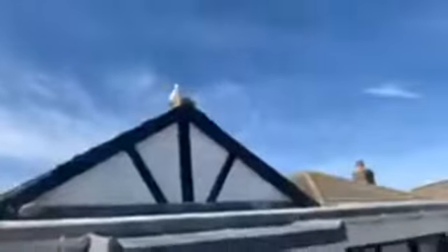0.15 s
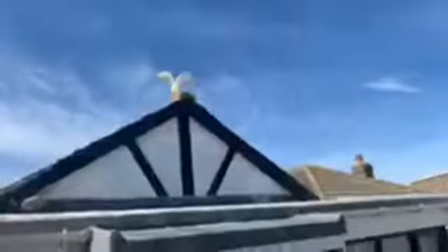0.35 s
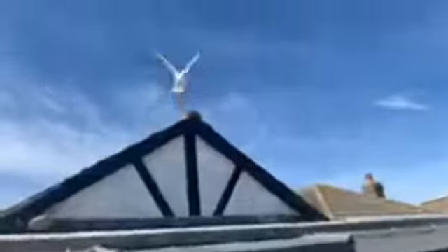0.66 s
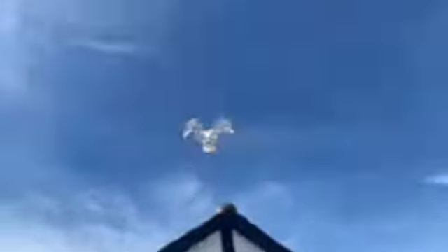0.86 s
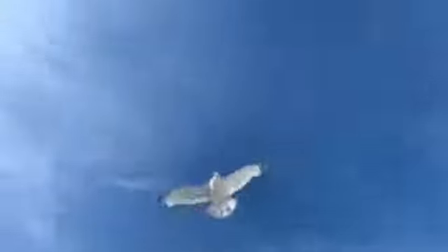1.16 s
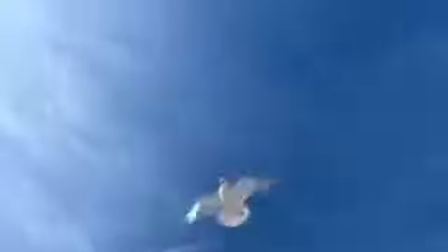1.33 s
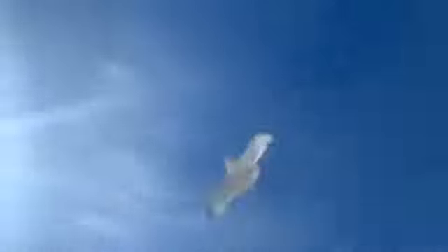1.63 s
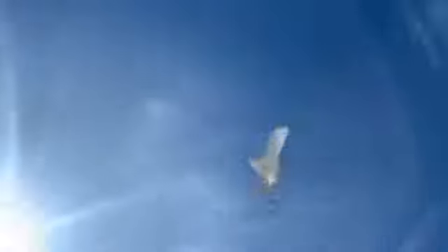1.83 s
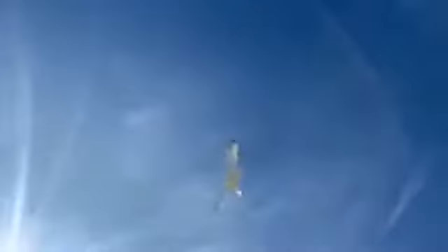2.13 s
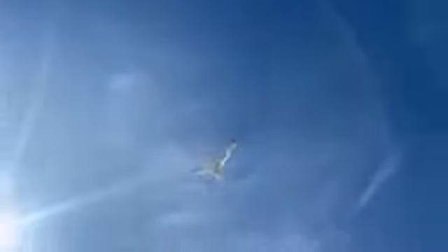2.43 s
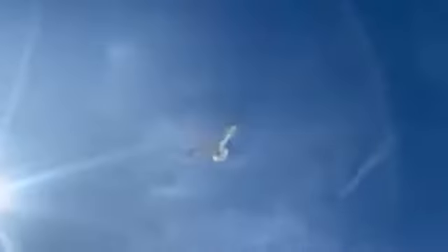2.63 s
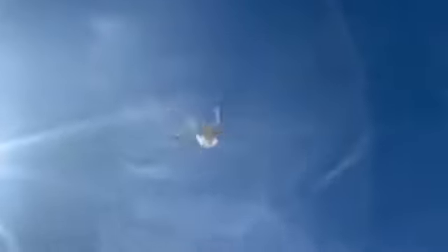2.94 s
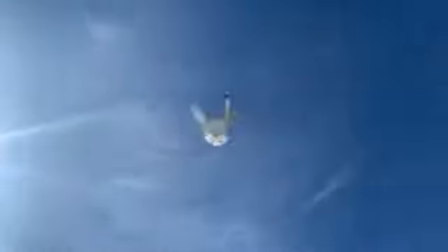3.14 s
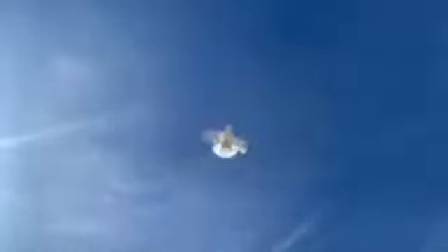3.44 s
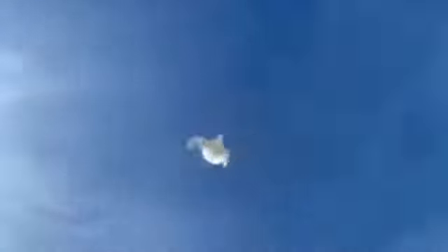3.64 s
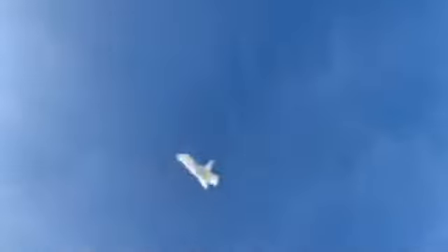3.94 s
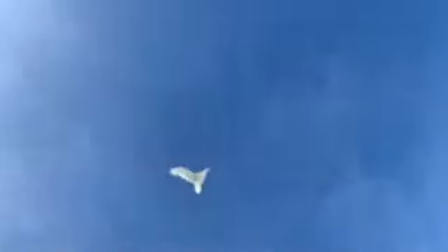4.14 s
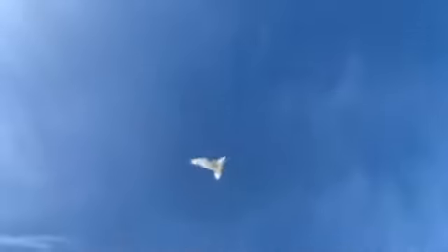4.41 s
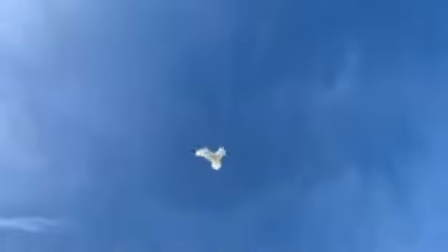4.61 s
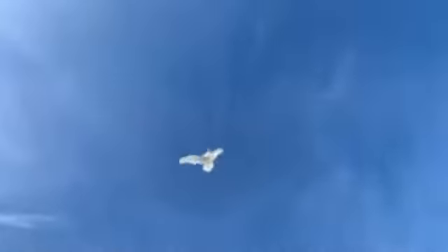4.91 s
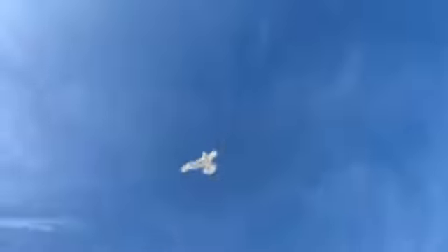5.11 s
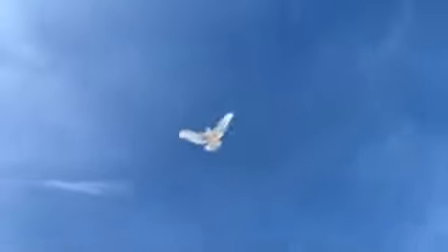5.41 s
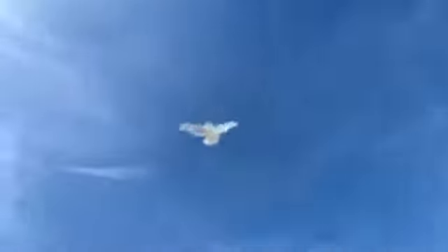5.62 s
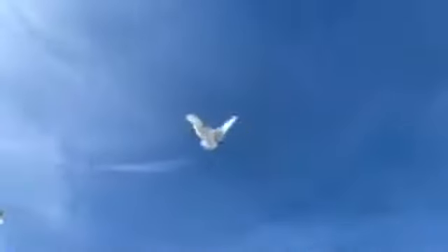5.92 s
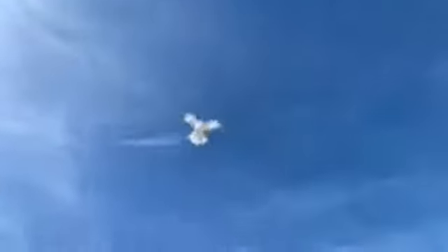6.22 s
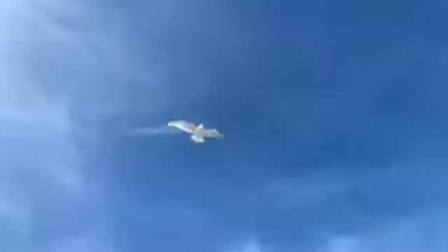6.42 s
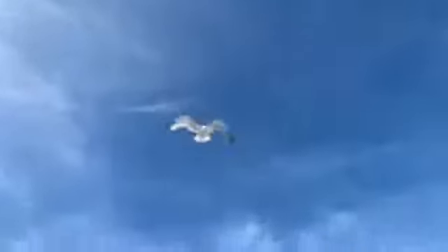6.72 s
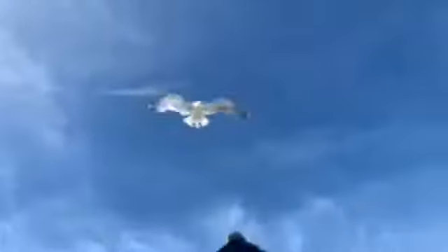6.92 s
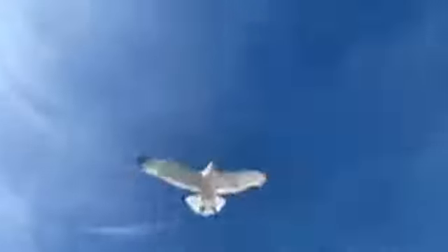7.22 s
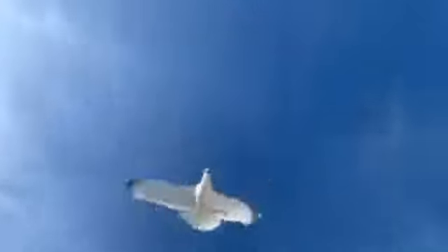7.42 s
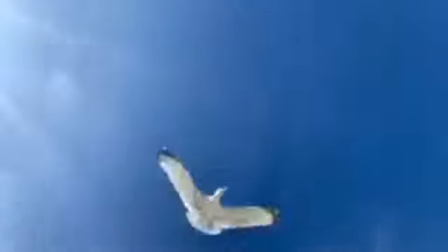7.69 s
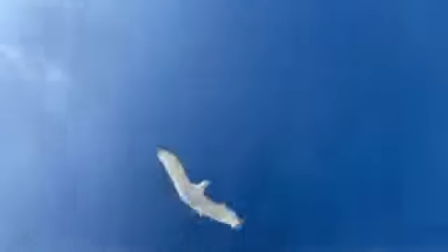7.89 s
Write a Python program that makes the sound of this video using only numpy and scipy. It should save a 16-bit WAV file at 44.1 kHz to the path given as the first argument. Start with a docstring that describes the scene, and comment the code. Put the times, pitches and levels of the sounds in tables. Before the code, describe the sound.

Low wind rumbles and flutters unevenly against the microphone throughout, with faint outdoor hiss and a barely audible distant hum. A gull gives eight loud alarm cries at about 0.5, 1.3, 2.1, 3.0, 3.9, 4.85, 6.1 and 7.35 s, each lasting 0.3 to 0.4 s: a brief rasp, a short note, a rough two-voiced break, a clean strong note near 1600 Hz, then a crack down to a lower note sliding away into a husky puff. The last is the loudest and brightest. A quieter, thinner young bird trills at 2.75-3.5, 4.5-5.3 and 6.25-6.9 s, about fifteen beats a second, alternating hoarse squeaks and whistles, with creaks; longer whistles sound around 4.8-5.1 s. Soft rustles come near 2.2, 4.3 and 5.5 s, light ticks at 4.4 and 5.4 s. Birds carry a slight roof echo and short wall reverberation. Wind alone closes around 8 s.

```python
"""Wind rumbles over a faint outdoor hiss and hum, made of coloured noise and a wandering sine. From half a second
on, a gull gives eight alarm cries; its syrinx jumps from a rasp to a short note, a two-voiced break, a high note
and a low note that slides away. From the third cry on, soft rustles and ticks are heard, and a thinner young bird
trills in three bouts of squeaks, whistles and creaks. A roof and walls reflect all but wind, hiss and hum."""
import sys
import numpy as np
from scipy import signal
from scipy.fft import rfft, irfft, next_fast_len
from scipy.io import wavfile
from scipy.ndimage import uniform_filter1d, minimum_filter1d

SR = 44100
rng = np.random.default_rng(int(sys.argv[2]) if len(sys.argv) > 2 else 0)


def store_wav(level_fs):
    """Save 16-bit WAV to argv[1]."""
    pcm = np.round(np.clip(np.atleast_2d(level_fs), -1, 1) * 32767)
    wavfile.write(sys.argv[1], SR, pcm.T.astype(np.int16))


N = 355357
TIME = np.arange(N) / SR
TOP_HZ = 15850  # highest overtone made, and the recorder's cutoff

# resonance of the gull's throat: frequency_hz, gain_db
THROAT_COLOUR = [(2000, -4), (2600, -2.5), (3300, -2.5), (4300, -10.5), (5200, -19.5), (9300, -33),
                 (11500, -48), (14500, -40.5)]
# spectrum of the gull's chaotic, noisy voice: frequency_hz, gain_db
RASP_COLOUR = [(600, -27.5), (1600, 12.5), (2100, -3), (3200, 1), (9500, -22.5), (11500, -50),
               (15000, -36.5)]
# resonance of the young bird's throat: frequency_hz, gain_db
YOUNG_COLOUR = [(3400, -4), (4600, -12), (5700, -10.5), (7000, -27.5), (13000, -55)]
# spectrum of the young bird's breath and creaks: frequency_hz, gain_db
CREAK_COLOUR = [(1000, -30.5), (1800, -4), (2300, 0), (2900, -1), (3900, -7), (4700, -8), (5500, -24.5),
                (12000, -67)]
# glide of the young bird's whistles, as shares of their pitch: start, middle, end
WHISTLE_GLIDE = (0.96, 0.96, .92)


def undb(db):
    """Amplitude ratio: 20 dB is a factor of ten."""
    return 10 ** (np.asarray(db) / 20)


def unit(x):
    """Normalisation by mean power: scale to rms 1."""
    return x / np.sqrt(np.mean(x ** 2) + 1e-18)


def gain_at(hz, colour):
    """Frequency response: decibels interpolated along log frequency, returned as gain."""
    point_hz, point_db = np.transpose(colour)
    return undb(np.interp(np.log(np.maximum(hz, 1)), np.log(point_hz), point_db))


def tint(x, colour):
    """Linear filtering: multiply the spectrum by a colour, then scale to rms 1."""
    size = next_fast_len(len(x))
    bin_hz = np.arange(size // 2 + 1) * SR / size
    coloured = irfft(rfft(x, size) * gain_at(bin_hz, colour), size)
    return unit(coloured[:len(x)])


def noise(t, colour):
    """Filtered white noise: a random signal as long as t with the given colour."""
    return tint(rng.standard_normal(len(t)), colour)


def walk(t, rate):
    """Band-limited random modulation: smooth blend of normal values drawn `rate` times a second."""
    place = (t - t[0]) * rate
    knots = rng.standard_normal(2 ** 12)
    k = place.astype(int)
    blend = np.sin(np.pi / 2 * (place - k)) ** 2
    return knots[k % len(knots)] * (1 - blend) + knots[(k + 1) % len(knots)] * blend


def span(start, end, fade=.009):
    """Equal-power crossfade: times, progress 0-1 and a soft gate that overlaps the neighbouring notes."""
    first = int((start - fade / 2) * SR)
    last = int((max(end, start + fade) + fade / 2) * SR)
    t = np.arange(first, last) / SR
    edge_distance = np.minimum(t - t[0], t[-1] - t)
    gate = np.sin(np.pi / 2 * np.clip(edge_distance / fade, 0, 1))
    return t, np.linspace(0, 1, len(t)), gate


def arc(u, *values):
    """Polynomial contour: a line or parabola through evenly spaced values."""
    places = np.linspace(0, 1, len(values))
    return np.polyval(np.polyfit(places, values, len(values) - 1), u)


def add(out, t, x):
    """Superposition: mix x into out at its times."""
    i = int(round(t[0] * SR))
    out[i:i + len(x)] += x[:len(out) - i]


def background(hum_hz=419, hum_db=-60, air_db=-45.5):
    """Stationary noise and a pure tone: outdoor hiss that swells a little, and a faint far hum."""
    # spectrum of the outdoor hiss: frequency_hz, gain_db
    air_colour = [(140, 0.5), (300, -8), (550, -13.5), (3000, -21), (4000, -30), (8000, -34),
                  (11500, -48.5), (15500, -47)]
    air = noise(TIME, air_colour) * undb(air_db + walk(TIME, 4.1))
    hum = np.sin(2 * np.pi * np.cumsum(hum_hz + 2 * walk(TIME, 10)) / SR)
    return air + np.sqrt(2) * undb(hum_db + 2 * walk(TIME, 5.4)) * hum


def wind(buffet_db=2, rumble_db=1.8, flutter_db=-6.5, flutter_growth=1.93, mean_gust_db=-28.0):
    """Turbulence at the microphone: large eddies rumble; smaller ones flutter and grow faster with each gust."""
    # strength of the gusts, before random buffeting: time_s, gust_db
    gusts = [(0.0, -26.5), (0.29, -25), (0.62, -32), (0.74, -18), (0.81, -25), (1.14, -23), (1.17, -28.5),
             (2.29, -34), (2.4, -25.5), (3.94, -26.5), (4.26, -34), (4.44, -28.5), (4.87, -39),
             (5.02, -27.5), (5.22, -33.5), (5.74, -29.5), (5.87, -49.5), (6.43, -37), (6.5, -29.5),
             (6.93, -38), (7.06, -19.5), (7.15, -30.5), (7.22, -25), (8.05, -30.5)]
    # spectrum of the large eddies: frequency_hz, gain_db
    rumble_colour = [(15, -8.5), (55, 8.5), (110, 1.5), (300, -63)]
    # spectrum of the small eddies: frequency_hz, gain_db
    flutter_colour = [(70, -24.5), (140, 2.5), (330, -19), (600, -35.5), (5000, -66.5)]
    gust_db = np.interp(TIME, *np.transpose(gusts)) + buffet_db * walk(TIME, 20)
    rumble = noise(TIME, rumble_colour) * undb(gust_db + rumble_db)
    flutter_gust_db = mean_gust_db + flutter_growth * (gust_db - mean_gust_db)
    flutter = noise(TIME, flutter_colour) * undb(flutter_gust_db + flutter_db)
    return rumble + flutter


def small_sounds():
    """Transient noise: rustles swell and fade in a band of frequencies; ticks start sharply and decay."""
    # soft rustles: start_s, length_s, centre_hz, level_db
    rustles = [(2.168, 0.065, 670, -38.5), (4.305, 0.098, 1520, -34.5), (5.523, 0.23, 1800, -47)]
    # light ticks: start_s, level_db
    ticks = [(4.438, -36.5), (5.384, -35)]
    out = np.zeros(N)
    for start, length, hz, db in rustles:
        t, u, _ = span(start, start + length)
        band = [(hz / 4, -18), (hz, 0), (hz * 5, -38)]
        add(out, t, undb(db) * np.sin(np.pi * u) * noise(t, band))
    for start, db in ticks:
        t, u, gate = span(start, start + 0.008, fade=0.00047)
        add(out, t, undb(db) * gate * np.exp(-4 * u) * noise(t, [(6000, 40), (15000, 10)]))
    return out


def syrinx(t, hz, overtones_db, throat, jitter, shimmer_db=1.76, flicker_db=3):
    """Source and filter: a membrane's harmonics, shaped by the throat, unsteady in pitch and strength."""
    phase = 2 * np.pi * np.cumsum(hz * (1 + jitter * walk(t, 500))) / SR
    tone = np.sin(phase)
    for k in range(2, int(TOP_HZ / np.max(hz)) + 1):
        strength = undb(overtones_db + flicker_db * walk(t, 33.6))
        tone = tone + gain_at(k * hz, throat) * strength * np.sin(k * phase)
    return np.sqrt(2) * tone * undb(shimmer_db * walk(t, 400))


def squeak(start, length, contour_hz, db, overtones_db, breathy_db=-18, waver=0.0155, uneven_db=2,
           hoarse=.3, hoarse_hz=335):
    """Amplitude modulation: a fast tremor and some breath noise make one thin note of the young bird hoarse."""
    t, u, gate = span(start, start + length)
    hz = arc(u, *contour_hz) * (1 + waver * walk(t, 80))
    tone = syrinx(t, hz, overtones_db, YOUNG_COLOUR, jitter=.01, shimmer_db=1.5)
    tremor_hz = hoarse_hz * np.exp(0.16 * walk(t, 60))
    tone = tone * (1 + hoarse * np.sin(2 * np.pi * np.cumsum(tremor_hz) / SR))
    level = undb(db + arc(u, -1, 1.63, 1.5) + uneven_db * walk(t, 70))
    return t, gate * level * (tone + undb(breathy_db) * noise(t, CREAK_COLOUR))


def creak(start, length, db, creak_hz=335, creak_scatter=0.13, ring_db=-3, ring_hz=3450):
    """Pulse excitation: the voice breaks up into separate pulses, which chop what remains of its tone."""
    t, u, _ = span(start, start + length)
    cycles = np.cumsum(creak_hz * np.exp(creak_scatter * walk(t, 80))) / SR
    clicks = np.diff(np.floor(cycles), prepend=0)  # one per cycle
    pulses = tint(clicks, CREAK_COLOUR) + undb(-15) * noise(t, CREAK_COLOUR)
    ring = syrinx(t, ring_hz * (1 + .06 * walk(t, 60)), -12, YOUNG_COLOUR, jitter=.02)
    ring = ring * np.exp(-3 * (cycles % 1))  # dies away after each pulse
    level = np.abs(np.sin(np.pi * u)) * undb(db + 2 * walk(t, 100))
    return t, level * unit(pulses + undb(ring_db) * tint(ring, CREAK_COLOUR))


def trill(second_voice_hz=2320, second_fade_db=18, second_masks_db=5):
    """Register switching: each beat flips from squeak to whistle; a second voice fades during the bout."""
    # bouts of chatter: start_s, end_s, beat_s, squeak_start_hz, squeak_end_hz (pitches across the bout)
    bouts = [(2.745, 3.53, .0668, 1780, 1800), (4.528, 5.3, .0672, 1780, 1760),
             (6.25, 6.93, .069, 2060, 1640)]
    # tone of each bout: level_db, overtones_db, second_voice_db (against the squeak)
    bout_tones = [(-35, 5, 1.5), (-28, -2.5, -14), (-28, -3.5, -6)]
    squeak_s, squeak_sag = .039, .13  # squeaks dip in the middle by a share of their pitch
    squeak_swell_db = 5.5  # squeaks are this much weaker at the ends of a bout
    whistle_hz, whistle_db = 3156, -4.5  # closes the beat; level against the squeak
    scatter, scatter_db = .03, 1.5  # chance in each squeak's glide (share of pitch) and strength
    out = np.zeros(N)
    for (start, end, beat_s, *pitch_hz), (level_db, overtones_db, second_db) in zip(bouts, bout_tones):
        beats = np.arange(start, end - beat_s / 2, beat_s)
        progress = np.linspace(0, 1, len(beats))
        chances = rng.standard_normal((len(beats), 4))
        for beat, u, chance in zip(beats, progress, chances):
            db = level_db - squeak_swell_db * (2 * u - 1) ** 2 + scatter_db * chance[0]
            dip = 1 + squeak_sag * np.array([.7, -.3, .5]) + scatter * chance[1:]
            main_hz = arc(u, *pitch_hz) * dip
            main_db = db - second_masks_db * undb(second_db) * (1 - u)
            add(out, *squeak(beat, squeak_s, main_hz, main_db, overtones_db))
            faded_db = db + second_db - second_fade_db * u ** 2
            add(out, *squeak(beat, squeak_s, second_voice_hz * dip, faded_db, overtones_db))
            if u < 1:  # the last beat has no whistle
                glide_hz = whistle_hz * np.array(WHISTLE_GLIDE)
                add(out, *squeak(beat + squeak_s, beat_s - squeak_s, glide_hz, db + whistle_db, overtones_db))
    return out


def young_bird(loud_overtones_db=-6, gives_way_db=-9):
    """One voice shared between registers: the trill gives way whenever a loud whistle or creak breaks out."""
    # loud whistles: start_s, length_s, pitch_hz, level_db
    loud_whistles = [(4.765, 0.079, 3000, -32.5), (4.827, .1, 4250, -31.5), (4.989, 0.15, 3097, -30),
                     (6.411, 0.026, 3316, -22), (6.551, 0.018, 3140, -21), (6.62, 0.013, 3070, -21.5)]
    # loud creaks: start_s, length_s, level_db
    loud_creaks = [(3.322, 0.022, -27.5), (3.444, 0.038, -32.5), (4.595, 0.058, -29.5),
                   (4.686, 0.026, -36.5), (5.258, 0.048, -30), (6.503, 0.029, -28.5), (6.7, 0.042, -29.5),
                   (6.777, 0.024, -29.5), (6.843, .026, -30.5), (6.92, 0.021, -37)]
    out, busy = np.zeros(N), np.zeros(N)
    outbreaks = []
    for start, length, hz, db in loud_whistles:
        glide_hz = hz * np.array(WHISTLE_GLIDE)
        outbreaks.append(squeak(start, length, glide_hz, db, loud_overtones_db, breathy_db=-8, hoarse=0.076))
    for start, length, db in loud_creaks:
        outbreaks.append(creak(start, length, db))
    for t, sound in outbreaks:
        add(out, t, sound)
        add(busy, t, np.sqrt(np.hanning(len(t))))
    return out + trill() * undb(gives_way_db * busy)


def opening_rasp(start, end, db):
    """Chaotic oscillation: the membranes start as swelling coloured noise."""
    t, u, gate = span(start, end)
    return t, gate * undb(db + arc(u, -12.5, -1.2, 0)) * noise(t, RASP_COLOUR)


def first_note(start, end, start_hz, settled_hz, db, overtones_db, husk_db):
    """Mode locking: the membranes lock into a short note that glides to its settled pitch."""
    t, u, gate = span(start, end)
    brightness_db = overtones_db + 3.5 + arc(u, 0, 1, -16.5)
    tone = syrinx(t, arc(u, start_hz, settled_hz), brightness_db, THROAT_COLOUR, jitter=0.011)
    level = undb(db - 2 + arc(u, -3.1, 1, -2.5))
    return t, gate * level * (tone + undb(husk_db + 0.5) * noise(t, RASP_COLOUR))


def two_voiced_break(start, end, high_hz, settled_hz, db, second_db, second_voice_hz=2460, above_hz=65):
    """Biphonation: the two sides of the syrinx split and fight, the second strongest at both ends."""
    t, u, gate = span(start, end)
    main_hz = (high_hz + above_hz) * (1 + .015 * walk(t, 79))  # just above the coming high note
    tone = syrinx(t, main_hz, -8.5, THROAT_COLOUR, jitter=0.0042, shimmer_db=1.0)
    second_hz = second_voice_hz * (1 + .015 * walk(t, 60))
    second = syrinx(t, second_hz, -6, THROAT_COLOUR, jitter=.016, shimmer_db=2)
    lingering_hz = settled_hz * (1 + 0.0063 * walk(t, 60))  # the first note lives on
    lingering = syrinx(t, lingering_hz, -7, THROAT_COLOUR, jitter=0.054)
    second = second + undb(-5 - 10 * u) * lingering + undb(-9) * noise(t, RASP_COLOUR)
    yields = 1 / (1 + undb(second_db + 21.5))  # the stronger the second voice, the weaker the main one
    second_level = undb(second_db + arc(u, 1.5, -12.5, 0.92))
    return t, gate * (undb(db - 6) * yields * tone + second_level * second)


def high_note(start, end, high_hz, db, overtones_db, husk_db, waver, swell_db):
    """Periodic oscillation: a loud, clean note sinks, a little faster at first."""
    sink_hz_per_s, sag_hz = 1660, 15
    t, u, gate = span(start, end)
    hold = np.sin(np.pi * u)
    hz = (high_hz - sink_hz_per_s * (t - start) - sag_hz * hold) * (1 + waver * walk(t, 40))
    tone = syrinx(t, hz, overtones_db, THROAT_COLOUR, jitter=0.005, shimmer_db=0.9)
    level = undb(db + arc(u, 0, .2, -1) + swell_db * walk(t, 54.8))
    return t, gate * level * (tone + undb(husk_db - 10 * hold) * noise(t, RASP_COLOUR))


def register_crack(low_s, low_db, crack_db=-12):
    """Bifurcation: the pitch snaps down with a crack of noise."""
    t, _, gate = span(low_s - .004, low_s)
    return t, gate * undb(low_db + crack_db) * noise(t, RASP_COLOUR)


def low_note(start, end, low_hz, low_db, fade_db, overtones_db, husk_db, waver, swell_db):
    """Falling frequency: the low note holds up at first, then slides away ever faster."""
    t, u, gate = span(start, end)
    hold = np.sin(np.pi * u)
    hz = low_hz * arc(u, 0.99, .752) * (1 + .028 * hold + waver * walk(t, 41.8))
    tone = syrinx(t, hz, overtones_db + 4 - 5 * u ** 3, THROAT_COLOUR, jitter=0.0067, shimmer_db=0.25)
    tone = tone * np.sqrt(np.minimum(10 * (1 - u), 1))  # the tone dies in the last tenth
    level = undb(low_db - fade_db * u + 5.4 * hold + swell_db * walk(t, 55.4))
    return t, gate * level * (tone + undb(husk_db) * noise(t, RASP_COLOUR))


def closing_puff(end_s, low_db, fade_db, fray_db=-14):
    """Turbulent flow: as the pressure runs out the voice frays into a husky puff of noise."""
    t, u, _ = span(end_s - .025, end_s + 0.036)
    puff = noise(t, [(700, -3.5), (1100, 3), (3200, -9), (6000, -42)])
    return t, undb(low_db - fade_db / 2 + fray_db) * np.sin(np.pi * u) ** 2 * puff


def cry(times, voice, husk_db=-35, waver=0.0052, swell_db=2.0):
    """Nonlinear register jumps: one alarm cry, stage by stage, as a list of (times, sound)."""
    rasp_s, first_s, high_s, low_s, end_s = times
    first_hz, high_hz, low_hz, db, low_db, fade_db, overtones_db, rasp_db, second_db = voice
    break_s = min(first_s + .048, high_s - 0.012)  # leaves the break at least 12 ms
    settled_hz = first_hz + .75 * (1500 - first_hz)  # three quarters of the way to 1500 Hz
    return [opening_rasp(rasp_s, first_s, rasp_db),
            first_note(first_s, break_s, first_hz, settled_hz, db, overtones_db, husk_db),
            two_voiced_break(break_s, high_s, high_hz, settled_hz, db, second_db),
            high_note(high_s, low_s, high_hz, db, overtones_db, husk_db, waver, swell_db),
            register_crack(low_s, low_db),
            low_note(low_s, end_s, low_hz, low_db, fade_db, overtones_db, husk_db, waver, swell_db),
            closing_puff(end_s, low_db, fade_db)]


def gull(edge_hz=9500, edge_slope=0.91, plain_rasp_db=-24):
    """Effort and spectral tilt: the harder a cry's opening rasp, the brighter the whole cry's top edge."""
    # register changes of each cry: rasp_s, first_note_s, high_note_s, low_note_s, end_s
    cry_times = [(0.516, 0.543, 0.648, 0.75, 0.86), (1.274, 1.294, 1.408, 1.478, 1.675),
                 (2.128, 2.142, 2.198, 2.37, 2.495), (2.992, 3.014, 3.12, 3.186, 3.385),
                 (3.901, 3.918, 3.952, 4.159, 4.305), (4.846, 4.86, 4.97, 5.048, 5.255),
                 (6.096, 6.11, 6.198, 6.317, 6.45), (7.355, 7.375, 7.484, 7.542, 7.735)]
    # voice of each cry: first_note_hz, high_note_hz, low_note_hz, level_db, low_note_db, low_note_fade_db,
    # overtones_db, opening_rasp_db, second_voice_db
    cry_voices = [(1642, 1556, 1190, -10, -21, 15.5, -10.5, -24.5, -31),
                  (1390, 1600, 1271, -12, -14.5, 19.5, -10.5, -20.5, -18.5),
                  (1440, 1659, 1200, -13.5, -20.5, 20, -10, -26, -21),
                  (1373, 1660, 1318, -13, -19, 14, -10, -24, -16.5),
                  (1380, 1655, 1180, -15, -20, 22.5, -10.5, -27.5, -53),
                  (1392, 1610, 1274, -15, -23, 9.5, -8.5, -30, -47),
                  (1430, 1605, 1228, -13, -18, 20, -11, -25, -45),
                  (1510, 1660, 1319, -8.7, -14.5, 12, -11.5, -17.5, -14)]
    out = np.zeros(N)
    treble = signal.butter(2, edge_hz, "high", fs=SR, output="sos")
    for times, voice in zip(cry_times, cry_voices):
        *_, rasp_db, _ = voice
        edge = undb(edge_slope * (rasp_db - plain_rasp_db)) - 1  # negative for soft rasps: duller
        for t, sound in cry(times, voice):
            add(out, t, sound + edge * signal.sosfiltfilt(treble, sound))
    return out


def houses(x, roof_db=-13, tail_db=-22.5, t60=0.42):
    """Reflection and reverberation: a roof echo with a wandering delay, and a short dull tail from walls."""
    lag = .012 + .002 * walk(TIME, 1.5)  # seconds; the path changes as the birds move
    bounce = np.interp(TIME - lag, TIME, x)  # its comb makes each gliding harmonic swell and dip
    t = TIME[:SR]
    tail = noise(t, [(2000, -10.5), (14000, -20.5)]) * undb(-60 * t / t60)
    tail = tail / np.sqrt(np.sum(tail ** 2))  # unit energy
    return x + undb(roof_db) * bounce + undb(tail_db) * signal.fftconvolve(x, tail)[:N]


def scene():
    """Superposition of sources: birds and small sounds among the houses, with wind and distance."""
    near = gull() + young_bird() + small_sounds()
    return (houses(near) + wind() + background())[None]


def record(dry, ceiling=.69, limit_s=.006):
    """Peak limiting and band limiting: hold down the loudest peaks, then cut the top."""
    size = int(limit_s * SR)
    needed_gain = ceiling / np.maximum(np.abs(dry), ceiling)
    gain = uniform_filter1d(minimum_filter1d(needed_gain, size), size)
    low_pass = signal.ellip(10, .2, 80, TOP_HZ, fs=SR, output="sos")
    return signal.sosfilt(low_pass, dry * gain)


dry = scene()
out = record(dry)
store_wav(out)
```